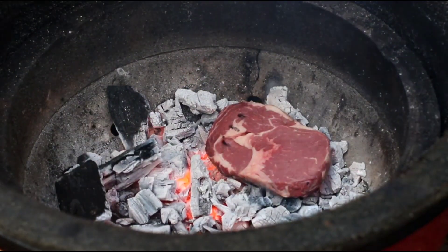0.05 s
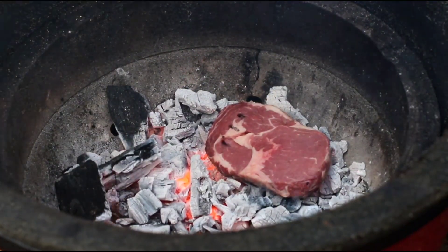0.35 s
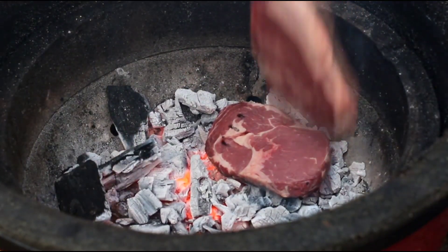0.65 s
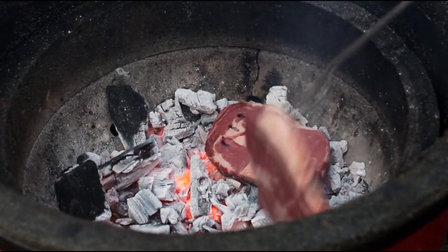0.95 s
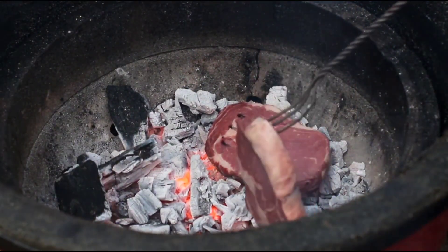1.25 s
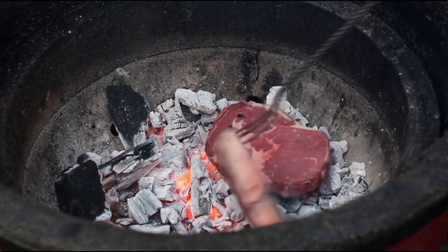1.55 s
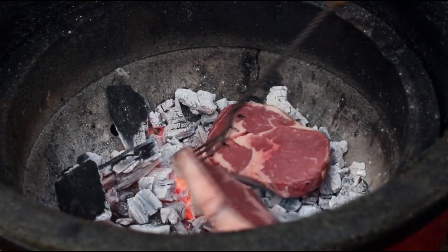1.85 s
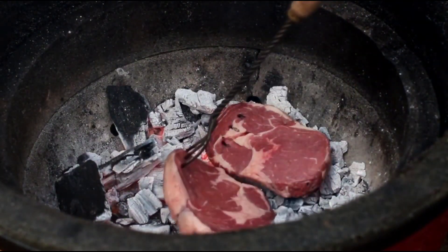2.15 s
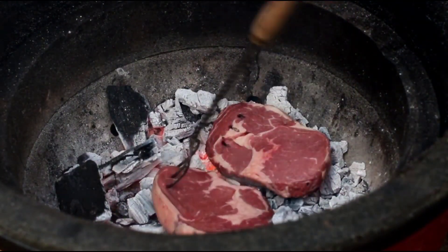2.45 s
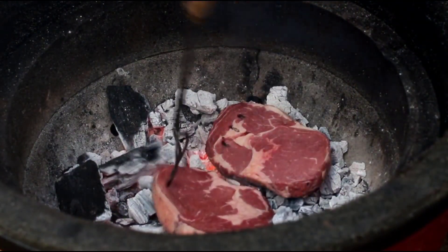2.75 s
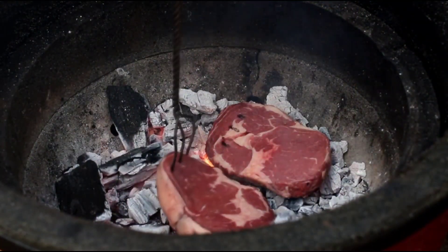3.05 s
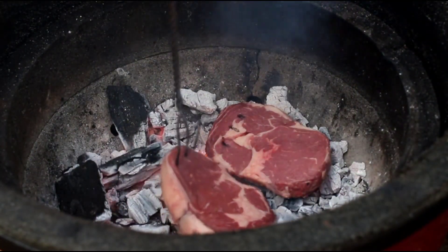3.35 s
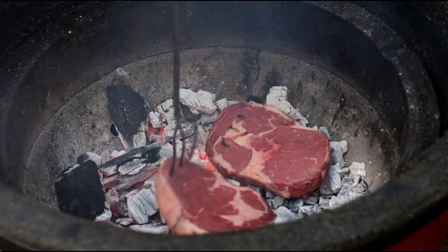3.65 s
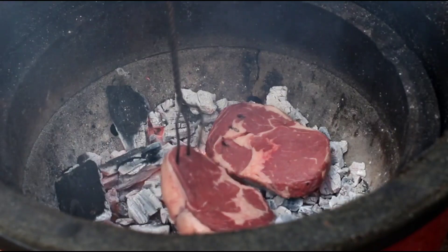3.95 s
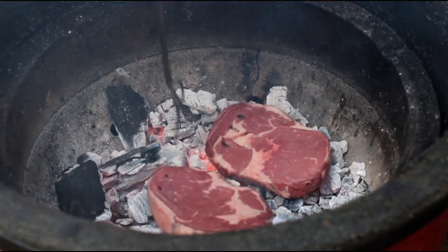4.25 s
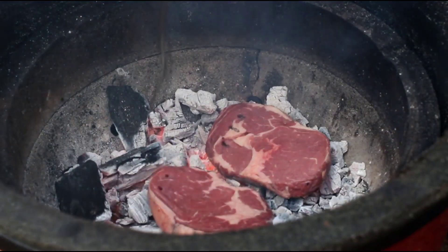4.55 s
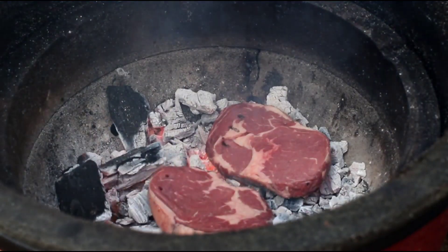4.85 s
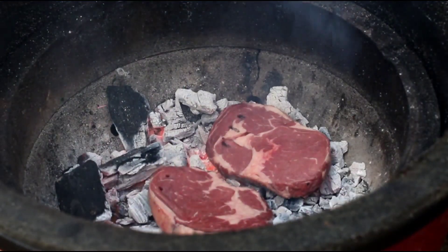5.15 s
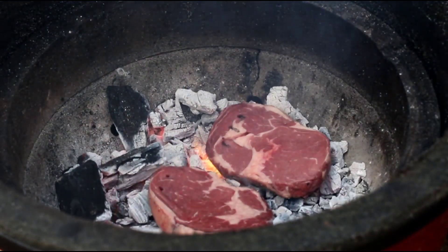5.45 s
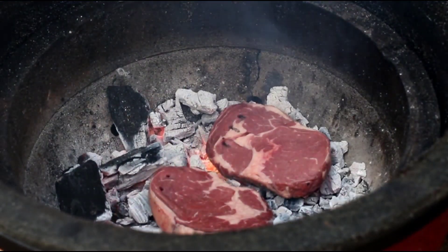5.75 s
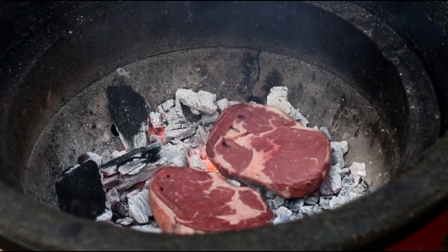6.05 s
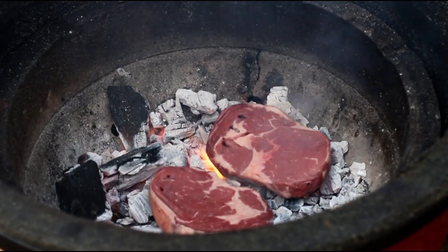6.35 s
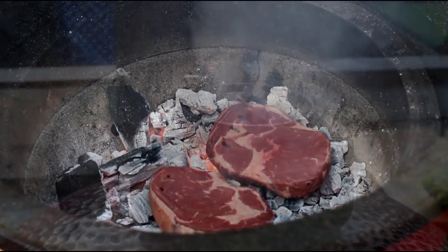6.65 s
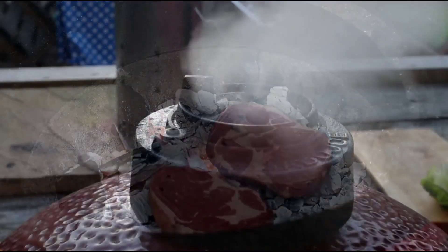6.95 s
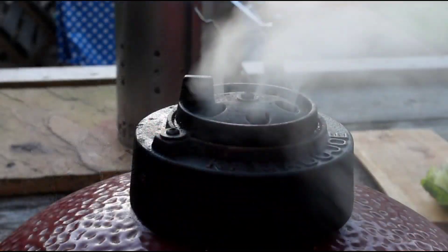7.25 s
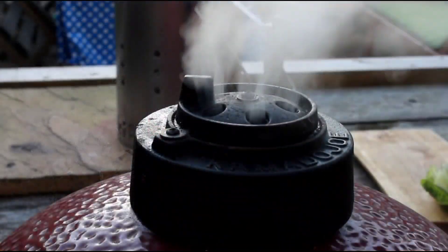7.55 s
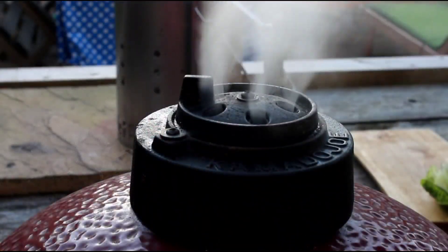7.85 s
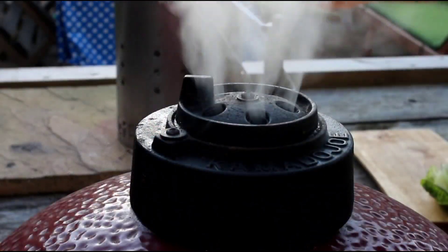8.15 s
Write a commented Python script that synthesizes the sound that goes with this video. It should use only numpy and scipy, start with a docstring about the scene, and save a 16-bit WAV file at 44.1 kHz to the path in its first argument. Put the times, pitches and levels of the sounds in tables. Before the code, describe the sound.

From the start, steak sizzles on hot charcoal in an outdoor grill, close to the microphone: a bright, steady hiss full of tiny bursts, with sharp spits of fat scattered throughout. Brittle coals clink lightly around 1.3 to 1.5 seconds, and again near 2, 3 and 5.4 seconds. At about 1.5 seconds a second steak meets the coals and the sizzle surges for half a second, then carries on with brief flares. Faint steam hisses out near 3 seconds and whistles thinly just after 4. The spitting thickens around 5.5 seconds. Between 6 and 6.7 seconds something hard knocks about five times beside the grill, dry and short, the last knock loudest. The lid then closes over about a second, leaving a quieter, smooth, muffled hiss until the end, just past 8 seconds. Far behind, faint tyre noise swells as cars pass.

```python
"""A bright, close sizzle: raw steaks on glowing lump charcoal in a ceramic kettle grill, outdoors. Juice boils
off as a hiss full of tiny bursts; fat spits, coals clink, trapped steam squeezes out with a hiss, and a bird
chirps a few times in thin, high tones. Near the end something hard knocks a few times beside the grill, then
the scene dissolves to a later moment, with the lid on and the sizzle a quiet, muffled hiss. Far behind, the
tyre noise of a road swells as cars pass. One microphone, mono."""
import sys
import numpy as np
from scipy import signal
from scipy.fft import rfft, irfft, next_fast_len
from scipy.io import wavfile
from scipy.ndimage import uniform_filter1d, map_coordinates

SR = 44100
rng = np.random.default_rng(int(sys.argv[2]) if len(sys.argv) > 2 else 0)


def generate_wav(signal):
    """Clip the signal to [-1, 1] and save it as 16-bit WAV at the path in sys.argv[1]."""
    frames = np.transpose(np.atleast_2d(signal))
    scaled = np.clip(frames, -1, 1) * 32767
    pcm = np.round(scaled).astype(np.int16)
    wavfile.write(sys.argv[1], SR, pcm)


N = 365456
DISSOLVE_S, DISSOLVE_LENGTH_S = 6.62, 1  # when the scene starts dissolving to a later moment with the lid on, and how long the dissolve takes


def amp(db):
    """Decibels to gain."""
    return 10 ** (np.asarray(db) / 20)


def unit(x):
    """x at rms 1."""
    return x / np.sqrt(np.mean(x ** 2) + 1e-20)


def curves(rows):
    """One value per sample for each column after the time."""
    times, *columns = np.transpose(rows)
    return [np.interp(np.arange(N) / SR, times, column) for column in columns]


def ramp(start, length):
    """Rises from 0 to 1 over length seconds."""
    return np.clip((np.arange(N) / SR - start) / length, 0, 1)


def swell(peak, length):
    """A smooth rise and fall, above half its height for length seconds."""
    return .5 ** np.minimum((2 * (np.arange(N) / SR - peak) / length) ** 2, 20)


def wobble(rate):
    """A smooth random curve, rate knots a second."""
    return map_coordinates(rng.standard_normal(int(N * rate / SR) + 4), [np.arange(N) * rate / SR])


def filtered(x, response):
    """x times a response of frequency."""
    size = next_fast_len(len(x) + 8192)
    return irfft(rfft(x, size) * response(np.fft.rfftfreq(size, 1 / SR)), size)[:len(x)]


def coloured(x, spectrum):
    """x shaped by (Hz, dB) points, at rms 1."""
    points_hz, db = np.transpose(spectrum)
    return unit(filtered(x, lambda hz: amp(np.interp(np.log(hz + 1), np.log(points_hz), db))))


def narrow(size, centre_hz, width_hz):
    """Noise of rms 1 in one resonance."""
    noise = rng.standard_normal(size)
    return unit(filtered(noise, lambda hz: 1 / (1 + (2 * (hz - centre_hz) / width_hz) ** 2)))


def band(x, low_hz, high_hz, order=2):
    """A causal band-pass, scaled to peak 1."""
    y = signal.sosfilt(signal.butter(order, [low_hz, high_hz], "band", fs=SR, output="sos"), x)
    return y / np.abs(y).max()


def burst_at(x, db, opening_s):
    """x scaled to an rms level over its opening stretch."""
    return amp(db) * x / np.sqrt(np.mean(x[:int(opening_s * SR)] ** 2))


def add(track, s, sound):
    """Mix a sound into the track at time s."""
    part = track[max(round(s * SR), 0):][:len(sound)]
    part += sound[:len(part)]


def traffic(roar_db=2.07, rush_db=-2, sway_db=1.1648, car_roar_db=-3.5, drone_db=-30.5):
    """Far from the microphone, tyre noise brightens and sings as cars pass; engines drone beneath."""
    # the steady stream on the far road: (time [s], relative roar [dB], relative rush [dB])
    road = [(0, -67, -69), (.9, -66.5, -68.5), (1.7, -67, -66.5), (3, -67.5, -64), (5, -64.5, -62),
            (6.75, -65.5, -58.5), (7.45, -73.5, -74), (8.29, -73, -100.5)]
    # nearer cars: (closest at [s], length [s], relative rush [dB], tyre song [dB])
    cars = [(1.218, 0.34, -82.5, -68), (2.33, 0.61, -60.5, -65), (3.927, 0.956, -59.5, -72),
            (5.547, 0.8, -63.5, -68), (6.145, 0.518, -57.5, -72)]
    # the low roar of tyres: (frequency [Hz], relative density [dB])
    roar_spectrum = [(20, -20.5), (45, -32.5), (80, -17.5), (140, -17.5), (240, -12.5), (310, -9),
                     (470, -8.5), (650, -1.5), (780, -0.5), (920, -1.5), (1100, -4), (1500, -11.5),
                     (3000, -16)]
    # their brighter rush: (frequency [Hz], relative density [dB])
    rush_spectrum = [(400, -43), (750, -9), (940, -4.5), (1150, -2.5), (1500, -3), (2100, -7), (3000, -16),
                     (5000, -23)]
    far_roar, far_rush = amp(curves(road))
    passes = [swell(s, length) for s, length, *_ in cars]
    car_rush, song = amp(np.array(cars)[:, 2:].T) @ passes
    low = np.hypot(far_roar, amp(car_roar_db) * song)
    bright = np.hypot(far_rush, car_rush)
    roar = low * amp(roar_db + sway_db * wobble(5)) * coloured(rng.standard_normal(N), roar_spectrum)
    rush = bright * amp(rush_db + sway_db * wobble(5.6)) * coloured(rng.standard_normal(N), rush_spectrum)
    tyres = song * narrow(N, centre_hz=916, width_hz=230)
    engines = bright * amp(drone_db) * narrow(N, centre_hz=52.6, width_hz=9.1)
    return roar + rush + tyres + engines


def steam_and_birds():
    """Steam forced out from under the meat hisses through wide gaps; a bird nearby chirps in thin, high tones."""
    # escapes of steam, then from 4.03 s bird chirps: (start [s], length [s], pitch [Hz], width [Hz], level
    # [dB])
    tones = [(1.038, 0.24, 3410, 1400, -66.5), (2.854, 0.596, 4250, 450, -65.5),
             (2.922, 0.573, 3595, 450, -65.5), (4.028, 0.038, 4322, 50, -58.5),
             (4.044, 0.1125, 4308, 70, -61.5), (4.24, 0.063, 4173, 80, -63.5),
             (4.305, .06, 4180, 100, -68.5), (7.68, 0.056, 7990, 80, -67)]
    track = np.zeros(N)
    for s, length, hz, width_hz, db in tones:
        size = int(length * SR)
        add(track, s, amp(db) * narrow(size, hz, width_hz) * signal.windows.tukey(size, .5))
    return track


def charcoal_clinks(t60=0.0325):
    """Down in the fire bowl, brittle lumps touch and ring briefly in a few uneven modes."""
    # lumps shifting and cracking: (time [s], lowest mode [Hz], relative level [dB])
    clinks = [(1.284, 6580, -41), (1.428, 3714, -54), (1.43, 4860, -48), (1.477, 4970, -43.5),
              (1.509, 4780, -48.5), (2.048, 6416, -37), (2.929, 1850, -49.5), (5.41, 4036, -46.5),
              (5.411, 5620, -41.5)]
    modes = [(1, -3), (1.15, -4.5), (1.23, -6.5), (1.52, -17)]  # (frequency ratio, level [dB])
    track, t = np.zeros(N), np.arange(SR // 10) / SR
    for s, hz, db in clinks:
        ring = sum(amp(level) * np.sin(2 * np.pi * hz * ratio * t) for ratio, level in modes)
        add(track, s, amp(db - 60 * t / t60) * ring)
    return track


def knocks(ring_db=-9, crack_db=-14, crack_t60=0.0296, tick_db=-16, tick_t60=0.0114,
           tail_db=-25, tail_t60=0.287):
    """Beside the grill, a dry crack and a short ring that depends on the spot struck; the yard answers."""
    # hard blows: (time [s], strength [dB], middle modes' gain [dB], high modes' gain [dB])
    blows = [(6.0646, -21.5, -7.5, 4), (6.182, -28, -11, 5), (6.408, -36, -10, 1), (6.581, -28, -7, -4),
             (6.6548, -12, 0, -0.5)]
    # what the blows set ringing: (frequency [Hz], relative level [dB], t60 [s])
    modes = [(569, -26, 0.081), (866.5, -19, 0.0665), (1171, -21.5, 0.0404), (1386, -16.5, 0.049),
             (1518, -11, 0.052), (1572.7, -13.5, 0.097), (2029, -23.5, 0.12), (2210, -23, 0.097),
             (2350, -13.5, 0.056), (2675, -14, .04), (2741, -1, 0.0348), (2839, -9.5, .04),
             (2916, -10, 0.064), (4147, -27.5, 0.058), (5346, -22, 0.047), (5340, -19, 0.034),
             (6230, -24.5, 0.033)]
    track, t = np.zeros(N), np.arange(SR // 4) / SR
    attack, tail_rise = 1 - np.exp(-t / 0.000527), 1 - np.exp(-t / 0.007)
    for s, db, middle_db, high_db in blows:
        ring = np.zeros(len(t))
        for hz, mode_db, t60 in modes:
            spot_db = 0 if hz < 2550 else middle_db if hz < 3500 else high_db
            phase = .5 * rng.standard_normal()  # one blow starts all modes nearly in step
            ring += amp(mode_db + spot_db - 60 * t / t60) * np.sin(2 * np.pi * hz * t + phase)
        crack, tick, tail = rng.standard_normal((3, len(t)))
        crack = amp(crack_db) * band(crack * amp(-60 * t / crack_t60), 793, 3750)
        tick = amp(tick_db) * band(tick * amp(-60 * t / tick_t60), 4760, 7230)
        tail = amp(tail_db) * band(tail * amp(-60 * t / tail_t60) * tail_rise, 1260, 3410)
        add(track, s, amp(db) * (amp(ring_db) * ring + crack + tick + tail) * attack)
    # the knocks keep no deep bass
    return signal.sosfilt(signal.butter(2, 330, "high", fs=SR, output="sos"), track)


def fat_spits(snap_trim_db=1, spray_trim_db=-1, body_trim_db=-3, snap_t60=.0035, spray_t60=0.0356,
              body_t60=0.0101, small_count=20, small_db=(-44, -51.5, -61), small_spread_db=4):
    """Close to the microphone, drops of fat explode: a sharp snap, a trailing spray, a lower body."""
    # the bigger drops, and at 1.43 s the crack of a clinking lump, before the trims: (time [s], snap [dB],
    # spray [dB], body [dB])
    big_drops = [(0.1414, -35.5, -47.5, -65.5), (0.2415, -30.5, -43, -60.5), (0.2926, -35.5, -48.5, -62),
                 (0.8232, -35, -44.5, -67), (1.2848, -39, -51.5, -50.5), (1.4302, -47.5, -55, -52),
                 (1.9782, -34.5, -51.5, -49), (2.0479, -30.5, -51, -48.5), (2.235, -29, -43.5, -51),
                 (2.707, -26, -40.5, -50), (2.93, -29.5, -46, -45.5), (2.9757, -35, -40, -55),
                 (3.024, -30, -43.5, -55), (3.212, -37, -47.5, -62), (3.2694, -34.5, -49, -51),
                 (3.701, -45, -43.5, -49.5), (3.8689, -26, -55.5, -60.5), (3.972, -28, -43, -53.5),
                 (4.146, -47.5, -55, -49), (4.6689, -33, -41, -58), (4.7848, -38.5, -52, -49),
                 (5.324, -31.5, -49, -61), (5.384, -34.5, -51, -58.5), (5.4103, -28, -39.5, -42),
                 (5.4812, -28, -37.5, -44), (5.612, -34.5, -53, -63), (5.6366, -28.5, -41.5, -51),
                 (5.7973, -32, -52, -57), (5.9972, -34, -50, -65), (6.2412, -35.5, -42.5, -50),
                 (6.9301, -39, -62, -67.5), (7.113, -44, -50.5, -52)]
    track, t = np.zeros(N), np.arange(SR // 20) / SR
    # small drops spit at random while the grill is open
    times = DISSOLVE_S * rng.random(small_count)
    levels = small_db + small_spread_db * rng.standard_normal((small_count, 3))
    for s, snap_db, spray_db, body_db in [*big_drops, *np.column_stack([times, levels])]:
        snap, spray, body = rng.standard_normal((3, len(t)))
        snap = band(snap * amp(-60 * t / snap_t60), 9800, 15600, order=3)
        spray = band(spray * amp(-60 * t / spray_t60), 7880, 16700, order=3)
        body = band(body * amp(-60 * t / body_t60), 2510, 10850)
        add(track, s, burst_at(snap, snap_db + snap_trim_db, opening_s=0.00235))
        add(track, s, burst_at(spray, spray_db + spray_trim_db, opening_s=0.0233))
        add(track, s, burst_at(body, body_db + body_trim_db, opening_s=0.00737))
    return track


def echoed(x, delay_s, strength):
    """One quick echo inside the grill ripples the colour of the hiss."""
    return filtered(x, lambda hz: 1 - strength * np.exp(-2j * np.pi * hz * delay_s))


def patchy(x, depth_db):
    """Spots of meat flare up and dry out, each with its own pitch of hiss."""
    spectra = signal.stft(x, nperseg=256)[2]
    patches = rng.standard_normal(spectra.shape)
    for _ in range(2):  # smooth across frequency, then time
        patches = uniform_filter1d(uniform_filter1d(patches, size=4, axis=0), size=26, axis=1)
    return signal.istft(spectra * amp(depth_db * unit(patches)), nperseg=256)[1][:N]


def bubbling(burst_share, bursts_per_s=2000, spread_db=5.0, largest_db=20.0, clump_db=1.51,
             puff_t60=.0016, scatter_db=-16, scatter_t60=.03):
    """Bubbles of juice burst over smooth steam noise, each a puff that scatters round the bowl."""
    born = rng.random(N) < bursts_per_s / SR
    # most bursts are tiny, a few stand out, and they come in clumps
    size_db = np.minimum(spread_db * rng.exponential(size=N), largest_db)
    sizes = amp(size_db + clump_db * wobble(90))
    t = np.arange(SR // 25) / SR
    burst_power = amp(-60 * t / puff_t60) ** 2 + amp(scatter_db - 60 * t / scatter_t60) ** 2
    power = np.abs(signal.fftconvolve(born * sizes ** 2, burst_power)[:N])
    return np.sqrt(burst_share * power / power.mean() + 1 - burst_share) * rng.standard_normal(N)


def sizzle(level_db=0.44, treble_db=0.77, flutter_db=0.87, burst_share=0.504,
           landing_s=1.474, dried_s=1.914, bowl_muffle=0.177, lid_muffle=0.878):
    """Right at the microphone, juice boils off the steaks; the lid leaves only a smooth, muffled hiss."""
    # how fiercely the juice boils between flares: (time [s], relative level [dB])
    boil = [(0, -43), (0.45, -43.5), (0.65, -45.5), (1.03, -45.5), (1.12, -44.5), (1.45, -44.3),
            (1.6, -36.5), (2.12, -42.5), (3.05, -40), (3.5, -42), (4.15, -41), (4.75, -39.5), (5.1, -40),
            (6.15, -44.5), (6.85, -42.5), (7.22, -45.5), (7.44, -50.5), (8.29, -50)]
    # juice flares on an ember, fine bubbles lift the treble: (peak [s], length [s], lift [dB], treble [dB])
    flares = [(0.185, 0.1, 0, 2), (1.701, 0.081, 1.5, 4.5), (1.914, 0.165, 6, 3), (2.248, 0.16, 1.5, 2.5),
              (2.464, 0.44, 1.63, 4), (3.379, 0.041, 3.5, 2), (3.763, 0.061, 4, 5), (3.883, 0.026, 2, 1),
              (4.304, 0.0805, 4.5, 1.58), (4.491, 0.223, 0.5, 3), (5.255, 0.056, 1, 0),
              (5.433, 0.16, 1, 2.5), (5.776, 0.269, 5.5, -1.5), (5.979, 0.045, 4, 0.5),
              (6.082, 0.051, 5.5, 0), (6.201, 0.078, 6, -4.5), (6.341, 0.0275, 6, -0.5),
              (6.532, 0.13, 5, -2)]
    # the sizzle in the open grill: (frequency [Hz], relative density [dB])
    open_spectrum = [(200, -45), (1000, -25), (2200, -20.5), (3200, -20), (4700, -18), (6000, -13.5),
                     (8000, -7.5), (10000, -3.5), (12500, -0.24), (14000, 0.5), (15500, -4)]
    # fresh meat low in the fire bowl: (frequency [Hz], relative density [dB])
    sear_spectrum = [(200, -41), (2000, -25.5), (3800, -27.5), (5500, -16), (8200, -9.5), (9700, -3),
                     (10900, -0.5), (12000, -3), (13800, -3), (15500, -1)]
    # the sizzle under the lid: (frequency [Hz], relative density [dB])
    closed_spectrum = [(200, -30), (1500, -21), (3000, -19.5), (5000, -16.5), (8000, -11.5), (11000, -6),
                       (13500, -2), (15500, 0)]
    boil_db, = curves(boil)
    lift_db, fine_db = np.array(flares)[:, 2:].T @ [swell(s, length) for s, length, *_ in flares]
    dissolve = ramp(DISSOLVE_S, DISSOLVE_LENGTH_S)
    merge_db = 0.18 * lift_db + 1.08 * fine_db  # separate bursts merge in a flare
    source = bubbling(np.clip(burst_share * amp(-merge_db) * (1 - dissolve ** 6), 0, 1))
    resting = coloured(echoed(source, delay_s=.00099, strength=.17), open_spectrum)
    searing = coloured(echoed(source, delay_s=.000977, strength=.3), sear_spectrum)
    # the second steak meets the coals and sears until its wet face has dried
    fresh = ramp(landing_s, 0.18) * (1 - ramp(dried_s, 0.097))
    uncovered = patchy((1 - fresh) * resting + fresh * searing, depth_db=1.0)
    treble = filtered(uncovered, lambda hz: 1 / (1 + (10500 / (hz + 1)) ** 8))
    uncovered += (amp(treble_db + fine_db) - 1) * treble
    # the bowl alone muffles a small share of the sound, the lid most of it
    muffle = bowl_muffle + (lid_muffle - bowl_muffle) * dissolve
    hiss = (1 - muffle) * uncovered + muffle * coloured(source, closed_spectrum)
    flicker_db = flutter_db * (1 - muffle) * wobble(25)
    return amp(boil_db + lift_db + level_db + flicker_db) * hiss


def scene():
    """The grill close by, the street far off."""
    return (sizzle() + fat_spits() + charcoal_clinks() + steam_and_birds() + knocks() + traffic())[None]


def record(dry):
    """The microphone's channel passes nothing above its band limit."""
    limit_hz = 15520
    return filtered(dry[0], lambda hz: 1 / np.sqrt(1 + (hz / limit_hz) ** 900))[None]


dry = scene()
out = record(dry)
generate_wav(out)
```